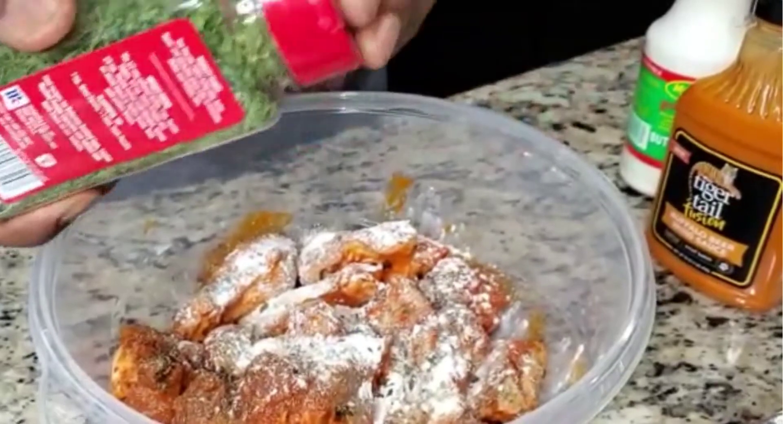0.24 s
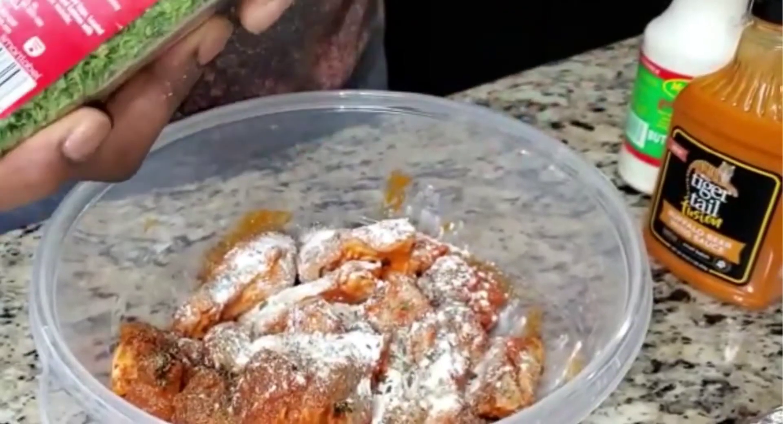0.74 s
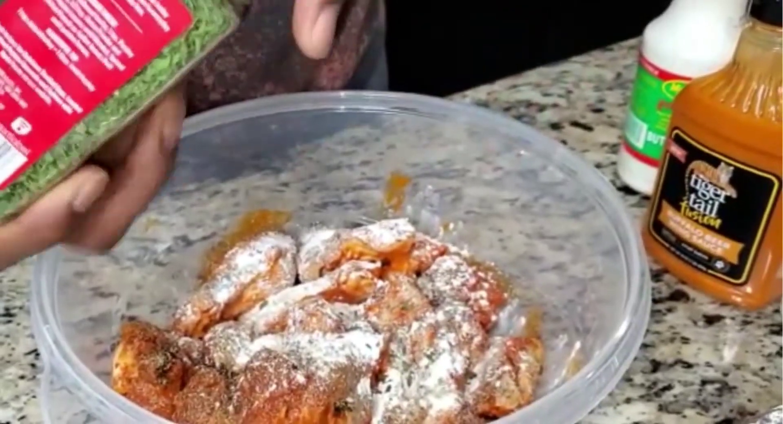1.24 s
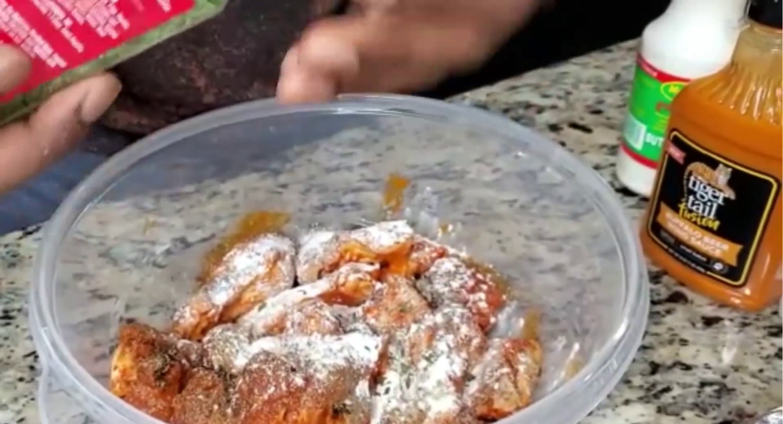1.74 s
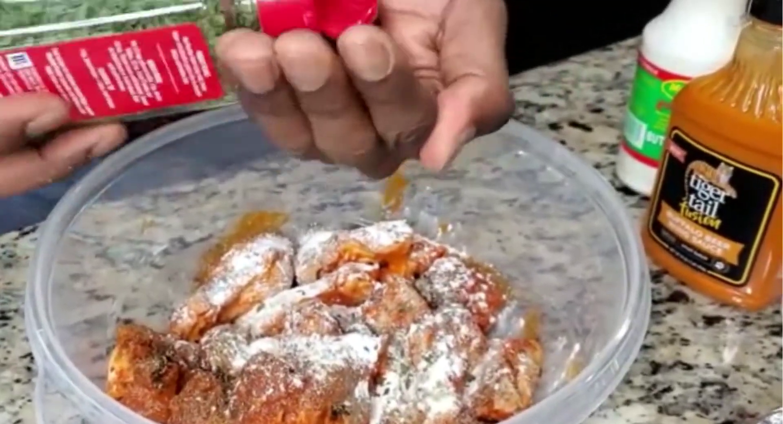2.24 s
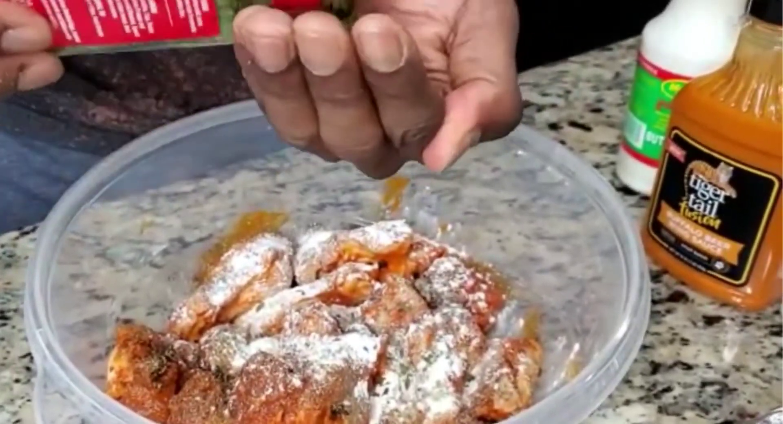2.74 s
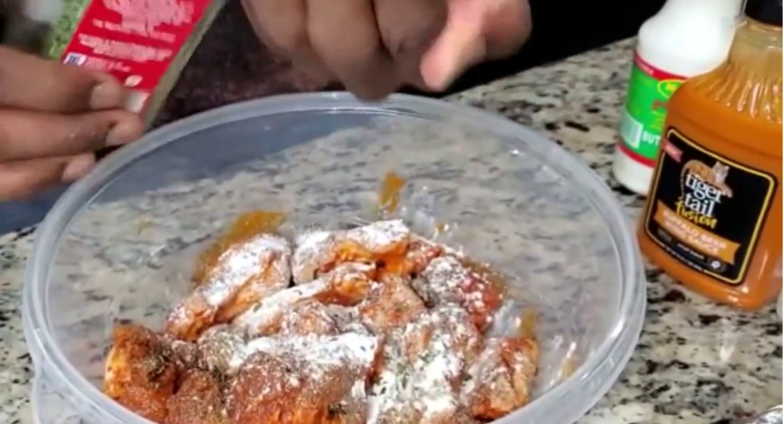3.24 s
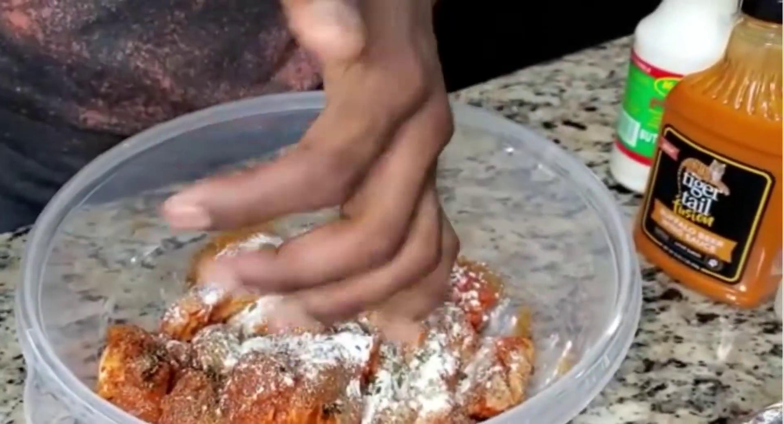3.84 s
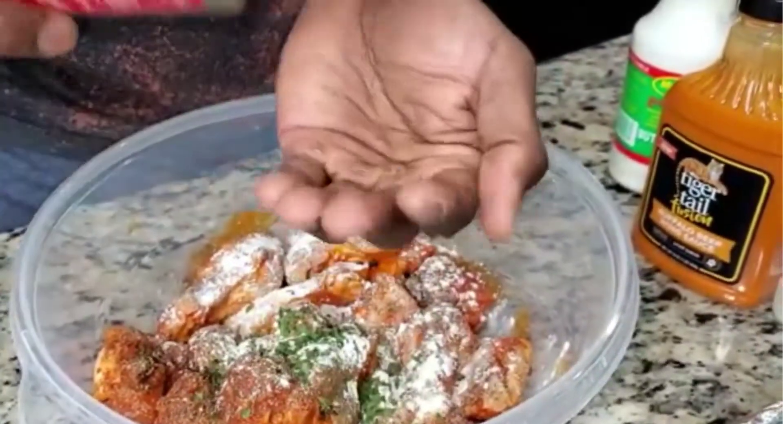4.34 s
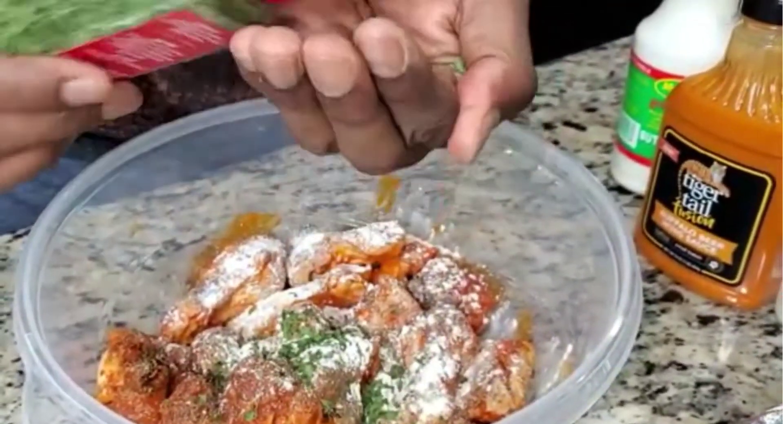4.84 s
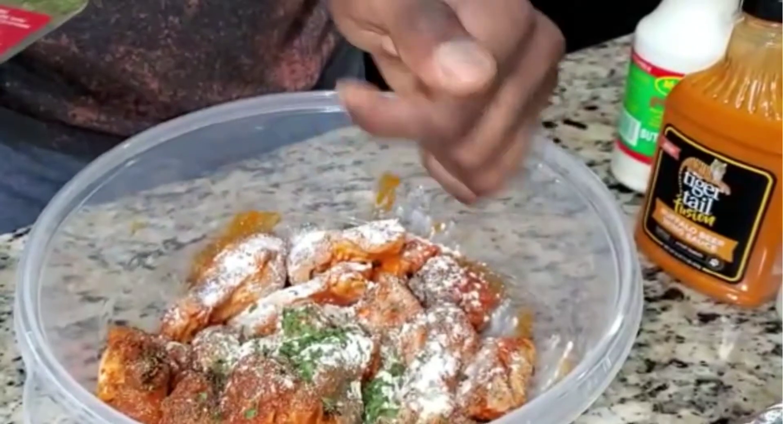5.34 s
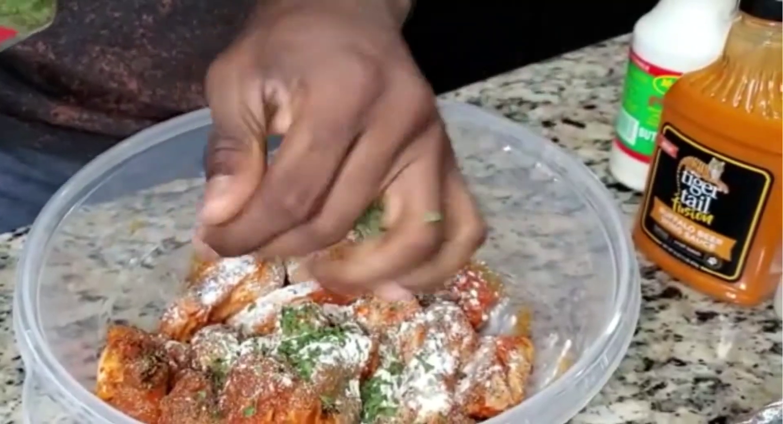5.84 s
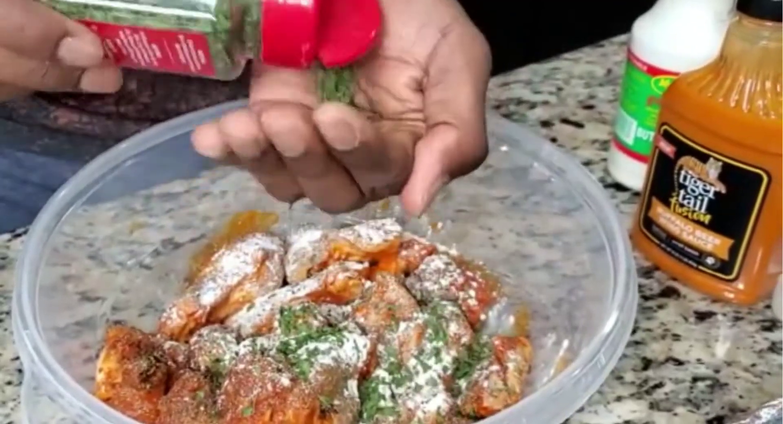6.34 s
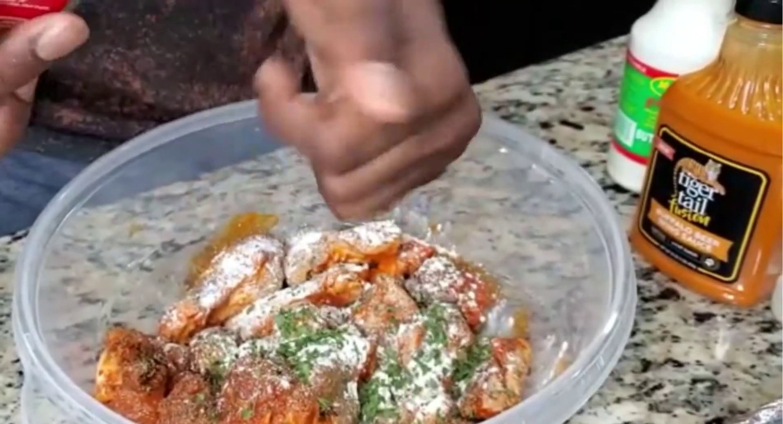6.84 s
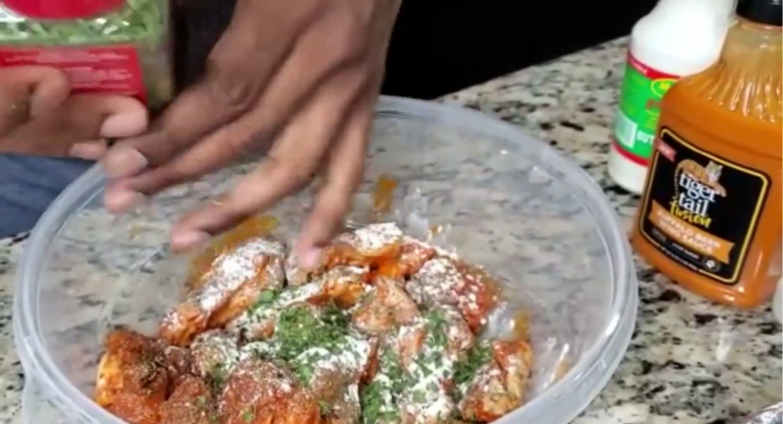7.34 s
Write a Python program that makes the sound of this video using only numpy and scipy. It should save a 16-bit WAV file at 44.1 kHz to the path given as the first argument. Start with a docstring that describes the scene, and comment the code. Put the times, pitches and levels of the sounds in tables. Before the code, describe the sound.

Dry leafy flakes rustle in a plastic jar after two sharp lid clicks and a slap. Quick shakes alternate with tight, gritty finger rubs and a thin rain of crumbs. The bright crackle leans right, the light taps slightly left. Short hard-room echoes and a steady fan drone surround it; a hard lid snap ends it.

```python
"""Dry leaves rustle and crackle close to the microphone: parsley is shaken from a plastic jar into a palm,
crumbled between the fingers and dropped on raw meat in a bowl, in a small hard kitchen with an appliance humming.
The flip lid snaps open, the jar gets a slap, and at the end the lid snaps shut: ringing modes and noise bursts.
Surges, rubs, falling crumbs and a faint stir drive random fractures and scraping; sudden crunches add bursts.
The crackle leans right over most of its treble; the light taps and lid slips lean slightly left."""
import sys
import numpy as np
from scipy import signal
from scipy.fft import rfft, irfft, next_fast_len
from scipy.io import wavfile
from scipy.ndimage import uniform_filter1d, map_coordinates

SR = 44100
rng = np.random.default_rng(int(sys.argv[2]) if len(sys.argv) > 2 else 0)


def log_audio(samples):
    """Write samples as a 16-bit WAV file to the path given in sys.argv[1]."""
    # one column per channel
    frames = np.atleast_2d(samples).T
    # limit to full scale, then quantise
    limited = np.clip(frames, -1, 1)
    pcm = np.round(limited * 32767).astype(np.int16)
    wavfile.write(sys.argv[1], SR, pcm)


N = 334322  # length in samples

# flakes stir faintly while the palm holds some: start_s, length_s
PALM_HOLDS = (1.82, 5.35)
STIR_CRACKLE_DB, STIR_SLIDE_DB = -80, -78  # before a slow random wobble
CATCH_DB, CATCHES_PER_S = 2.0, 170  # the pinch sticks and slips under the fingers


def herbs():
    """Shaking, rubbing and sprinkling all drive the same crackle and sliding; their powers add."""
    jar_crackle, jar_slide = surges()
    hand_crackle, hand_scrape, hollow_hz = rubs()
    catching = unit(amp(CATCH_DB * wobble(CATCHES_PER_S)))
    stir = stroke(*PALM_HOLDS, attack=0.18, release=0.96) * amp(1.14 * wobble(7.2))
    stir_crackle = amp(STIR_CRACKLE_DB) * stir
    breaking = np.linalg.norm([jar_crackle, catching * hand_crackle, sprinkles(), stir_crackle], axis=0)
    loose = np.hypot(jar_slide, amp(STIR_SLIDE_DB) * stir)
    return flakes(breaking) + sliding(loose, catching * hand_scrape, hollow_hz)


# a pinch of flakes gives way at once: start_s, level_db (before a common trim), fall_s (time to fall by 60 dB)
PINCH_CRUNCHES = [(0.389, -33, 0.12), (0.463, -45.5, 0.095), (2.4329, -43.5, 0.085), (3.5578, -45, 0.046),
                  (3.5843, -55, 0.09), (4.3795, -43, 0.14), (4.506, -45.5, 0.12), (4.923, -49, 0.025),
                  (5.1208, -47, 0.033), (5.341, -33, 0.03), (5.443, -33.5, 0.06), (5.522, -35, 0.017),
                  (5.6, -39.5, 0.044), (5.757, -35, 0.065), (5.9045, -50, 0.073), (6.2622, -40, 0.065),
                  (6.698, -41, 0.15)]
# tone of breaking leaves: pitch_hz, level_db (relative, per Hz)
FLAKE_SPECTRUM = [(600, -35), (1800, -18.5), (3000, -11.5), (4300, -8), (5600, -7), (6800, -12.5),
                  (7700, -18), (8600, -24.5), (9500, -13), (10500, -3.5), (12200, -2.5), (13800, -3.5),
                  (15500, -11.5), (16500, -5)]
# balance of the crackle between the ears: pitch_hz, left_minus_right_db
CRACKLE_SIDE = [(1000, 10), (2200, 0), (3200, 1.5), (4500, -3.5), (6500, -3), (8500, 5), (10200, -4.5),
                (11200, -6), (12600, -14.5), (15000, -6)]
SNAPS_PER_S, SNAPS_DB = 130, -5  # single stiff flakes snap amid the fine crackle


def flakes(gain):
    """Dry leaves slide and break in clumps; now and then a whole pinch gives way."""
    clumps = unit(amp(2.1 * wobble(45) + 0.5 * wobble(240)))
    fine = clumps * crackle(rate=6500, spread_db=3)
    snaps = amp(SNAPS_DB) * crackle(rate=SNAPS_PER_S, spread_db=-1)
    rustle = amp(-1.0) * gain * unit(coloured(fine + snaps, FLAKE_SPECTRUM))
    t = np.arange(SR // 5) / SR
    crush = np.zeros(N)
    for s, db, fall in PINCH_CRUNCHES:
        onset = 1 - np.exp(-t / 0.00086)
        add(crush, s, amp(db - 9.0) * fading(t, fall) * onset)
    crunching = crush * unit(coloured(crackle(rate=4300, spread_db=2.5), FLAKE_SPECTRUM))
    out = placed(patchy(rustle + crunching, depth_db=1.7), 0, CRACKLE_SIDE)
    return out + shifting_kitchen(out, early_db=-2.0, late_db=-9)


# tone of loose flakes sliding: pitch_hz, level_db (relative, per Hz)
SLIDE_SPECTRUM = [(250, -3), (700, 1), (1250, 5), (1900, -2), (2900, -1.5), (3600, -1.5), (4500, -1),
                  (6200, -8.5), (7500, -14), (8600, -61), (11000, -18), (16000, -51)]


def sliding(loose_gain, cupped_gain, hollow_hz):
    """Flakes scrape over plastic and skin; in a closed hand the hollow rings at modes that follow the grip."""
    hz, t, z = signal.stft(crackle(rate=4000, spread_db=3.5), SR, nperseg=256)
    hz, centre = hz[:, None], np.interp(t, np.arange(N) / SR, hollow_hz)

    def mode(pitch, width):
        return 1 / (1 + (2 * (hz - pitch) / width) ** 2) ** 2

    hollow = mode(centre, 760)
    hollow = hollow + amp(-3.5) * mode(2.1 * centre, 1800)
    hollow = hollow + amp(-6) * mode(2.7 * centre, 2000)
    cupped = unit(signal.istft(z * hollow, SR, nperseg=256)[1][:, :N])
    # loose flakes tumble in sparser, grittier clumps; a few slip out of the closed hand too
    loose = unit(coloured(crackle(rate=1600, spread_db=3.2) * amp(2.2 * wobble(90)), SLIDE_SPECTRUM))
    escaping_gain = amp(-15.5) * cupped_gain
    rub = cupped_gain * cupped + np.hypot(loose_gain, escaping_gain) * loose
    rub = patchy(rub, depth_db=3)
    out = placed(amp(-1) * rub, 0, [(1000, 3.5), (2300, 3.0), (4400, -3.0)])
    return out + kitchen(out, early_db=-8, late_db=-12.5)


# the jar is tipped or shaken and its flakes surge along the wall:
# crest_s, length_s, crackle_db, slide_db (drive levels)
JAR_SURGES = [(0.025, 0.017, -78, -73), (0.369, 0.024, -66, -64.5), (0.96, 0.056, -69.5, -55.5),
              (1.053, 0.035, -58.5, -55), (1.137, 0.054, -85, -72.5), (1.255, 0.14, -81, -70.5),
              (1.476, 0.03, -73, -68.5), (1.56, 0.031, -71, -63.5), (1.866, 0.029, -58, -59),
              (1.99, 0.055, -61, -66.5), (2.1, 0.049, -63, -69), (2.485, 0.048, -56, -58.5),
              (2.603, 0.037, -58.5, -68.5), (2.699, 0.067, -60.5, -66.5), (2.807, 0.049, -65.5, -72),
              (3.11, 0.043, -81, -71), (3.287, 0.057, -67, -70), (4.388, 0.06, -58, -62),
              (4.5, 0.063, -57.5, -62), (4.647, 0.097, -73, -96), (6.158, 0.047, -56.5, -66),
              (6.255, 0.044, -58.5, -63), (6.363, 0.048, -55, -61), (7.45, 0.12, -69, -73),
              (7.538, 0.05, -63, -68)]
SETTLE = 0.98  # time a surge takes to settle, relative to the time it builds


def surges():
    """Gains of crackle and sliding in the jar: each surge swells to a rounded crest and settles."""
    gains = np.zeros((2, N))
    for s, length, crackle_db, slide_db in JAR_SURGES:
        start = max(s - .5, 0)
        t = start - s + np.arange(SR) / SR  # time from the crest
        u = 2 * t / np.where(t < 0, length, length * SETTLE)
        swell = np.exp(1 - np.hypot(1, u * 1.203))
        add(gains, start, amp([[crackle_db], [slide_db]]) * swell)
    return gains


# the fingers grind a pinch in the closed hand: start_s, length_s, crackle_db, scrape_db (drive levels
# halfway through), hollow_hz (pitch of the hand's hollow at the start), rise_octaves_per_s
HAND_RUBS = [(3.468, 0.24, -58, -68, 1800, 0.3), (3.583, 0.13, -50.5, -53, 1680, 3.9),
             (3.905, 0.1, -66, -69.5, 2060, 1.1), (4.906, 0.16, -63, -88, 2000, 0.3),
             (5.015, 0.18, -51.5, -64.5, 1850, 1.5), (5.294, 0.034, -56.5, -69, 2430, 0.5),
             (5.435, 0.025, -54, -58.5, 2260, 0.5), (5.598, 0.081, -59, -68, 1920, 0.3),
             (5.67, 0.088, -54, -60.5, 1970, 1.9), (6.705, 0.028, -49.5, -57.5, 2000, 0.86),
             (6.762, 0.023, -60, -64, 2110, 0.57), (6.803, 0.052, -48.5, -64, 2100, 1.5)]
RUB_ATTACK_S, RUB_RELEASE_S = 0.05, 0.11  # time to rise and to fall by 60 dB
CRACKLE_GROWS_DB, SCRAPE_GROWS_DB = 6, -3  # over one rub: as the grip tightens, more flakes break, fewer slide


def rubs():
    """Gains of crackle and scraping in the hand, and the pitch of its hollow, which rises as the fist tightens."""
    breaking, scrape, pitch = np.zeros((3, N))
    now = np.arange(N) / SR
    for s, length, crackle_db, scrape_db, hollow_hz, rise in HAND_RUBS:
        crackle_stroke = stroke(s, length, RUB_ATTACK_S, RUB_RELEASE_S, CRACKLE_GROWS_DB)
        scrape_stroke = stroke(s, length, RUB_ATTACK_S, RUB_RELEASE_S, SCRAPE_GROWS_DB)
        breaking += (amp(crackle_db) * crackle_stroke) ** 2
        power = (amp(scrape_db) * scrape_stroke) ** 2
        scrape += power
        # where rubs overlap the stronger one dominates the pitch
        pitch += power * hollow_hz * 2 ** (rise * np.clip(now - s, 0, length))
    return np.sqrt(breaking), np.sqrt(scrape), pitch / scrape


# crumbs rain on the meat: start_s, length_s, level_db (drive level)
CRUMB_FALLS = [(3.737, 0.03, -67.5), (3.859, 0.1, -63.5), (5.223, 0.075, -63.5), (5.495, 0.12, -64.5),
               (5.802, .04, -71), (5.898, 0.019, -68.5), (6.882, 0.055, -70), (6.976, .05, -60.5)]
SPRINKLE_ATTACK_S, SPRINKLE_RELEASE_S = 0.068, 0.43  # time to rise and to fall by 60 dB


def sprinkles():
    """Gain of the crumbs that rain down and thin out."""
    power = np.zeros(N)
    for s, length, db in CRUMB_FALLS:
        power += (amp(db) * stroke(s, length, SPRINKLE_ATTACK_S, SPRINKLE_RELEASE_S)) ** 2
    return np.sqrt(power)


# clumps of flakes shaken out or flicked off the palm: start_s, length_s, level_db
CLUMP_SHAKES = [(3.923, 0.026, -61), (3.997, 0.022, -56.5), (4.466, .07, -65), (6.144, 0.033, -60.5),
                (6.212, 0.098, -58.5), (6.327, 0.062, -56.5)]
# tone of a tumbling clump: pitch_hz, level_db (relative, per Hz)
CLUMP_SPECTRUM = [(600, -29), (1200, -11), (1800, -5), (2300, 1.5), (2950, 2), (3600, -3), (5500, -29),
                  (8000, -41), (16000, -27)]


def shakes():
    """A clump tumbles as a short swell of coarse, separate grains."""
    gain = np.zeros(N)
    for s, length, db in CLUMP_SHAKES:
        add(gain, s, amp(db) * np.sqrt(np.hanning(max(round(length * SR), 2))))
    grains = unit(coloured(crackle(rate=1000, spread_db=4.0), CLUMP_SPECTRUM))
    out = placed(gain * grains, 0, [(1000, 1)])
    return out + kitchen(out, early_db=-8.5, late_db=-16.5)


# hard blows on jar and lid: start_s, knock_db (thin wall), knock_hz (centre), snap_db (lid), thud_db (palm),
# left_lead_ms, left_minus_right_db; levels before common trims, balance before a tilt with pitch
JAR_BLOWS = [(0.0582, -11, 950, -24, -32.5, 0.049, -1.5), (0.118, -17, 930, -15, -55, 0.08, 3),
             (0.1196, -48, 1500, -20, -45, 0.05, 22.5), (0.9023, -14.5, 1280, -33, -25, 0.07, -2),
             (0.9064, -38, 1200, -47.5, -40.5, 0.079, 4), (0.9232, -25, 2300, -44, -61, 0.056, -2),
             (7.5604, -33, 4000, -39, -68, 0.042, 2), (7.571, -14.5, 910, -48, -58, 0.31, 3),
             (7.5745, -16.5, 2000, -10.5, -25.5, 0.114, 1)]
# ringing modes of the jar's walls: pitch_hz, level_db (relative), t60_s
WALL_MODES = [(629, -12, 0.1), (820, -21.5, 0.03), (943, -0.5, 0.012), (1130, -9.5, 0.0099),
              (1315, -9.5, 0.016), (1577, -13.5, 0.04), (1930, -12, 0.019), (2670, -7, 0.019),
              (4120, -4.5, .012), (4610, -11, 0.0058), (5560, -31.5, .012)]
# modes of the jar's hollow body: pitch_hz, level_db (relative), t60_s
BODY_MODES = [(132, -7.5, 0.15), (190, -4, 0.1), (225.7, 1.5, 0.038), (325, -3, 0.028), (460, -18.5, 0.012)]
# tone of the lid's snap: pitch_hz, level_db (relative, per Hz)
SNAP_SPECTRUM = [(200, -36.5), (450, -1), (900, -1.5), (1700, -7.5), (2800, -0.5), (5500, 3.5), (7000, -3),
                 (8700, -4), (10500, 2.5), (12300, 4.5), (14000, -4.5), (16000, -1.5)]


def jar():
    """Each blow rings the thin walls, cracks the lid's catch and thumps the hollow body."""
    out, t = np.zeros((2, N)), np.arange(SR * 3 // 4) / SR
    hz, wall_db, _ = np.transpose(WALL_MODES)
    body_db = np.transpose(BODY_MODES)[1]

    def rings(modes):
        return np.array([fading(t, t60) * np.sin(2 * np.pi * f * t) for f, _, t60 in modes])

    for s, knock_db, centre_hz, snap_db, thud_db, lead_ms, side_db in JAR_BLOWS:
        # where the jar is struck favours the modes near one pitch
        off_centre_db = 8.4 * np.abs(np.log2(hz / centre_hz))
        strengths = amp(wall_db - off_centre_db + rng.normal(0, 1, len(hz)))
        knock = amp(knock_db - 5.5) * above(strengths @ rings(WALL_MODES), 576, order=3)
        thud = amp(thud_db - 7) * above(amp(body_db) @ rings(BODY_MODES), 130, order=2)
        # the catch chatters briefly towards each ear; the room gathers its whole, even spectrum
        chatter = rng.choice([-1, 1], (2, len(t))) * fading(t, 0.0084) * (1 - np.exp(-t / 0.00034))
        snap = amp(snap_db + 3.0) * coloured(chatter, SNAP_SPECTRUM)
        radiated = amp(snap_db + 12.5) * coloured(signal.unit_impulse(len(t)), SNAP_SPECTRUM)
        room = kitchen(radiated, early_db=-7, late_db=-2.5)
        room += kitchen(knock - thud, early_db=-11.0, late_db=-8)
        tilt = [(1500, side_db + 3.0), (5000, side_db - 6.5), (12500, side_db - 3)]
        add(out, s, placed(knock + snap - thud, lead_ms, tilt) + room)
    return out


# light finger taps on the jar, and clumps landing:
# start_s, level_db (peak, before a common trim), pitch_hz, thump_db (peak of the jar's body)
LIGHT_TAPS = [(1.063, -41, 912, -61.5), (1.273, -50.5, 1700, -69), (1.3623, -48, 700, -61.5),
              (1.5585, -37, 1320, -50), (3.9315, -46, 2130, -80), (4.0047, -47, 2370, -80),
              (4.135, -48, 802, -76), (4.1767, -48.5, 1020, -59), (4.7112, -47.5, 1550, -61),
              (4.8, -46.5, 1760, -47), (6.1654, -58, 3330, -74), (6.343, -54, 2830, -80),
              (6.367, -57, 2860, -80), (6.7989, -35.5, 1860, -57), (7.3756, -40.5, 1200, -47),
              (7.4112, -38.5, 910, -45.5), (7.4645, -43.5, 1300, -48), (7.5181, -38, 945, -45)]
# tone of a touch: pitch_hz, level_db (relative, per Hz)
TAP_SPECTRUM = [(150, -8), (700, 6), (2000, -4.5), (5500, 7.5), (7000, -3), (8600, -22), (11000, 8),
                (15000, -3)]
TAP_T60_S = 0.035


def taps():
    """Soft contacts: a short burst of noise in one broad resonance, and one low push of the jar's body."""
    out, t = np.zeros(N), np.arange(SR // 12) / SR
    for s, db, pitch_hz, thump_db in LIGHT_TAPS:

        def resonance(hz):
            drive = (.6 * pitch_hz + 1j * hz) * pitch_hz
            return drive / (1.3 * (pitch_hz ** 2 - hz ** 2) + 1j * hz * pitch_hz)

        touch = coloured(rng.choice([-1, 1], len(t)) * fading(t, TAP_T60_S), TAP_SPECTRUM)
        pat = filtered(touch, resonance)
        thump = t * fading(t, 0.021) * np.sin(2 * np.pi * 190 * t)
        pat = amp(db - 5.0) * pat / np.abs(pat).max()
        add(out, s, pat + amp(thump_db) * thump / np.abs(thump).max())
    out = placed(out, 0.099, [(1000, 0.97)])
    return out + kitchen(out, early_db=-3.5, late_db=-6.5)


# the thumb slips on lid and jar, thin squeaks and dull scuffs:
# start_s, length_s, level_db, pitch_hz, width_hz (between the -6 dB points)
THUMB_SLIPS = [(0.0, 0.034, -62, 2730, 332), (0.672, 0.026, -77, 3930, 1400),
               (1.268, 0.028, -61.5, 1590, 1280), (1.562, 0.005, -55, 1353, 550)]


def slips():
    """Skin slips over plastic: a brief stutter of friction in one resonance."""
    out = np.zeros(N)
    for s, length, db, pitch_hz, width_hz in THUMB_SLIPS:
        stutter = crackle(rate=2500, spread_db=2)[0]
        friction = filtered(stutter, lambda hz: 1 / (1 + 2j * (hz - pitch_hz) / width_hz) ** 2)
        out += amp(db) * stroke(s, length, attack=0.029, release=0.07) * unit(friction)
    out = placed(out, 0.08, [(1000, 1.1)])
    return out + kitchen(out, early_db=-5.5, late_db=-12.5)


# how long the kitchen rings: pitch_hz, t60_s
KITCHEN_T60 = [(150, 0), (600, 0.33), (2000, 0.49), (5000, 0.41), (8500, 0.5), (12000, 0.23), (16000, 0.55)]
# tone of its hard surfaces: pitch_hz, level_db (relative)
WALL_SPECTRUM = [(150, -10), (700, -4.5), (2000, 3), (4800, 1.5), (6500, -2), (8600, -14), (11000, 3),
                 (13000, -6), (16000, -16)]


def kitchen(x, early_db, late_db):
    """The answer to a sound: quick echoes from bowl and counter, then the room's tail."""
    hz, t, z = signal.stft(rng.standard_normal((2, SR * 3 // 4)), SR, nperseg=256)
    decay = fading(t, along(KITCHEN_T60, hz)[:, None])
    tone = amp(along(WALL_SPECTRUM, hz))[:, None]
    tail = signal.istft(z * decay * tone, SR, nperseg=256)[1]
    t = np.arange(tail.shape[1]) / SR
    tail = tail * (1 - np.exp(-t / 0.0017))
    early = rng.standard_normal(tail.shape) * fading(t, 0.1) * (t > .001)
    early = filtered(early, lambda f: amp(along(WALL_SPECTRUM, f)))
    answer = (amp(late_db) * unit(tail) + amp(early_db) * unit(early)) / np.sqrt(len(t))
    return signal.fftconvolve(np.atleast_2d(x), answer, axes=1)[:, :x.shape[-1]]


DRIFT_PER_S = 9  # changes of echo pattern a second, cycling through a few


def shifting_kitchen(x, early_db, late_db, count=3):
    """The hands keep moving, so their echoes drift from one pattern to the next, cycling through count of them."""
    turn = np.arange(N) / SR * DRIFT_PER_S
    out = 0
    for k in range(count):
        weight = np.cos(np.pi / 2 * np.clip(np.abs((turn - k) % count - count / 2), 0, 1))
        out = out + kitchen(x * weight, early_db, late_db)
    return out


# motor and fan lines: pitch_hz, level_db (rms, before its wobble), waver_hz
MOTOR_LINES = [(56.9, -75, 1.8), (70.4, -77.5, 1.6), (122.6, -78.5, 1.6), (218.7, -66.5, 3),
               (249, -77, 0.91), (410.3, -73, 3.054), (483.7, -78, 1.9), (645, -74, 1.14), (1540, -85, 0.3)]
# tone of the fan's drone: pitch_hz, level_db (relative, per Hz)
DRONE_SPECTRUM = [(25, -27.5), (45, -21.5), (57, 8), (72, -12.5), (88, -5.5), (115, -4.5), (150, -4.5),
                  (175, 0), (205, 0), (245, 2), (285, -7), (400, -7.5), (455, -11), (620, -10.5),
                  (740, -13), (900, -31), (1500, -81.5)]
# tone of the faint hiss: pitch_hz, level_db (relative, per Hz)
HISS_SPECTRUM = [(400, -7), (800, 3.5), (1250, 0), (1900, -0.5), (2900, -12.5), (4300, -4.5), (5500, -3.5),
                 (6600, -12), (8400, -32.5), (10200, -12), (11300, -11.5), (15000, -16), (16000, -29.5)]
# balance of the background between the ears: pitch_hz, left_minus_right_db
BACKGROUND_SIDE = [(60, -1), (110, 0), (200, 0.5), (380, 1), (700, 1.0), (1290, -0.5), (2380, 1.5),
                   (4400, 0), (8120, 0), (15000, -2)]


def appliance():
    """A motor's wavering lines over the drone of its fan and faint hiss."""
    hum = np.zeros(N)
    for hz, db, waver_hz in MOTOR_LINES:
        level = amp(db + 1.3 * wobble(6)) * np.sqrt(2)
        hum += level * np.sin(2 * np.pi * np.cumsum(hz + waver_hz * wobble(9)) / SR)
    # the thin whine of a power supply
    whine = filtered(rng.standard_normal(N), lambda hz: np.exp(-((hz - 15600) / 70) ** 2))
    hum += amp(-83) * unit(whine)
    noise = amp(-60) * steady(DRONE_SPECTRUM) + amp(-72.5) * steady(HISS_SPECTRUM)
    return placed(hum + noise, 0, BACKGROUND_SIDE)


# how alike the background noise is at both ears: pitch_hz, correlation (1 is the same, 0 unrelated)
EAR_LIKENESS = [(60, 0.8), (200, 0.93), (400, 0.72), (700, 0.28), (1500, -0.15), (10000, 0.02)]


def steady(spectrum):
    """Stereo room noise of rms 1, most alike at both ears in the bass."""
    def turn(hz):
        return np.arccos(np.clip(along(EAR_LIKENESS, hz), -1, 1)) / 2

    def split(hz):
        return amp(along(spectrum, hz)) * [np.cos(turn(hz)), np.sin(turn(hz))]

    mid, side = filtered(rng.standard_normal((2, N)), split)
    return unit(np.array([mid + side, mid - side]))


def crackle(rate, spread_db):
    """Tiny fractures of scattered sizes at random moments, each thrown differently to the two ears; rms 1."""
    sizes = amp(spread_db * np.minimum(rng.standard_exponential(N), 4.5))
    return unit((rng.random(N) < rate / SR) * sizes * rng.standard_normal((2, N)))


def stroke(start, length, attack, release, grows_db=0):
    """Gain of one gesture: attack before start, a hold that grows by grows_db, release."""
    t = np.arange(N) / SR - start
    hold = amp(grows_db * (np.clip(t / length, 0, 1) - .5))
    rise = fading(np.clip(-t, 0, 2 * attack), attack)
    return hold * rise * fading(np.clip(t - length, 0, 2 * release), release)


def patchy(x, depth_db):
    """Moving fingers shade and reflect some bands more than others."""
    z = signal.stft(x, nperseg=256)[2]
    field = rng.standard_normal(z.shape[1:])
    for _ in range(2):
        field = uniform_filter1d(field, size=3, axis=0)  # across pitch
        field = uniform_filter1d(field, size=18, axis=1)  # across time
    return signal.istft(z * amp(depth_db * unit(field)), nperseg=256)[1][:, :N]


def placed(x, lead_ms, side):
    """Stereo: the left ear leads by lead_ms; side gives left minus right dB by frequency."""
    ears = np.array([[.5], [-.5]])

    def response(hz):
        return amp(ears * along(side, hz)) * np.exp(2j * np.pi * hz * ears * lead_ms / 10 ** 3)

    return filtered(x, response)


def amp(db):
    """Decibels to gain."""
    return 10 ** (np.asarray(db) / 20)


def unit(x):
    """Scale to rms 1."""
    return x / np.sqrt(np.mean(x ** 2) + 1e-20)


def along(points, hz):
    """(Hz, value) points read on a log axis."""
    f, v = np.transpose(points)
    return np.interp(np.log(hz + 1), np.log(f + 1), v)


def wobble(rate):
    """A smooth random curve, rate knots a second."""
    return map_coordinates(rng.standard_normal(int(N * rate / SR) + 4), [np.arange(N) * rate / SR])


def filtered(x, response):
    """x times a complex response of frequency."""
    n = x.shape[-1]
    m = next_fast_len(n + 8192)
    return irfft(rfft(x, m) * response(np.fft.rfftfreq(m, 1 / SR)), m)[..., :n]


def coloured(x, spectrum, size=1024):
    """x through a causal (minimum-phase) filter of energy 1 with the given spectrum."""
    cepstrum = irfft(np.log(amp(along(spectrum, np.fft.rfftfreq(size, 1 / SR)))))
    cepstrum[1:size // 2] *= 2
    cepstrum[size // 2 + 1:] = 0
    kernel = irfft(np.exp(rfft(cepstrum)))
    return signal.lfilter(kernel / np.linalg.norm(kernel), 1, x)


def above(x, hz, order):
    """Causal high-pass."""
    return signal.sosfilt(signal.butter(order, hz, "high", fs=SR, output="sos"), x)


def fading(t, t60):
    """Gain that falls 60 dB in t60."""
    return np.exp(-np.log(1000) * t / np.maximum(t60, 1e-4))


def add(track, s, sound):
    """Mix a sound into a track at time s."""
    start = max(round(s * SR), 0)
    part = track[..., start:start + sound.shape[-1]]
    part += sound[..., :part.shape[-1]]


def scene():
    """Herbs in the hands, the jar and its lid, and the kitchen's hum."""
    return herbs() + shakes() + jar() + taps() + slips() + appliance()


TOP_HZ = 16100  # middle of the recorder's 200 Hz wide cut-off


def record(dry):
    """The recorder keeps nothing above its band limit."""
    return filtered(dry, lambda hz: np.clip((TOP_HZ - hz) / 200 + .5, 0, 1))


dry = scene()
out = record(dry)
log_audio(out)
```